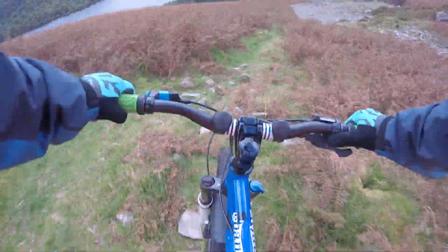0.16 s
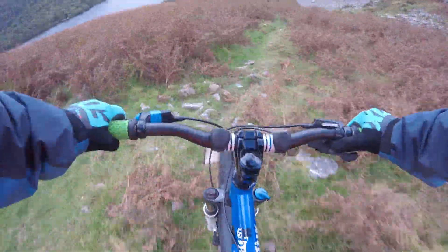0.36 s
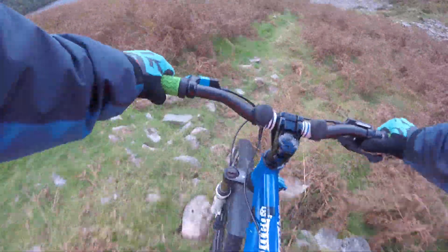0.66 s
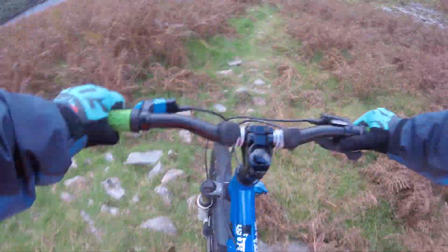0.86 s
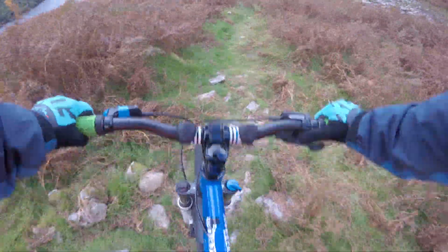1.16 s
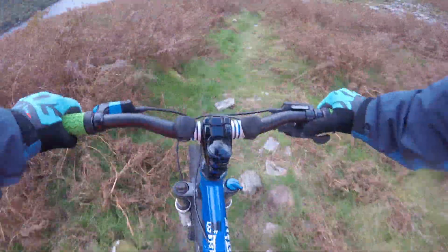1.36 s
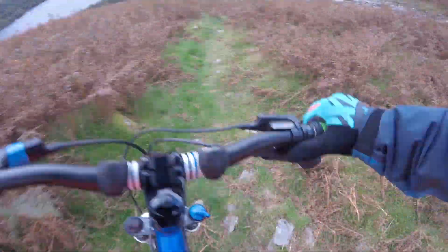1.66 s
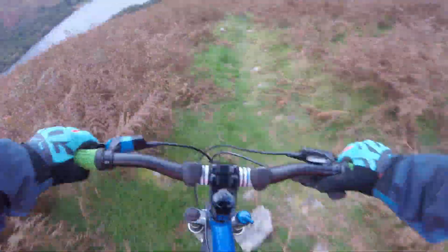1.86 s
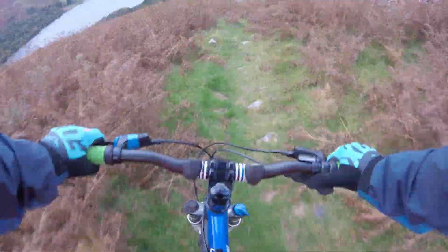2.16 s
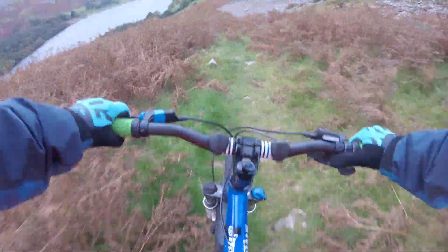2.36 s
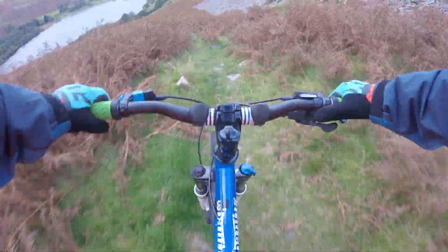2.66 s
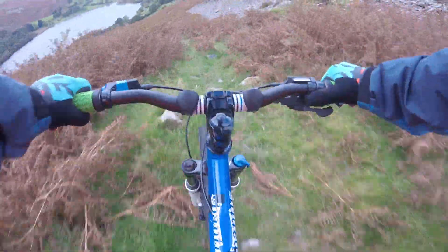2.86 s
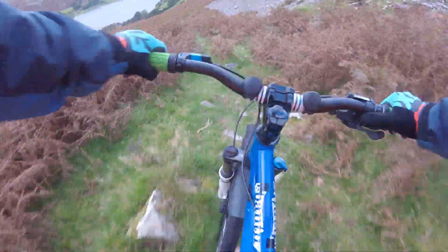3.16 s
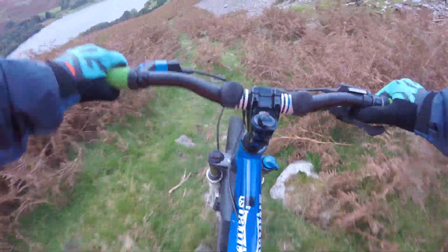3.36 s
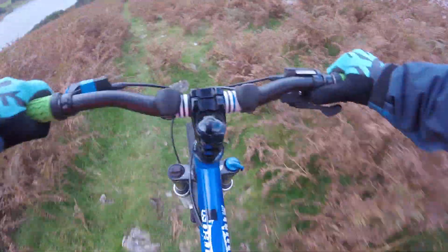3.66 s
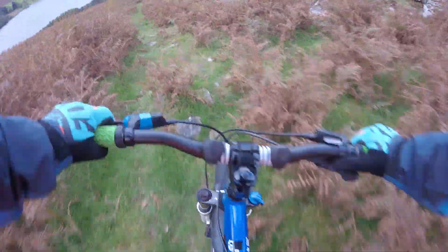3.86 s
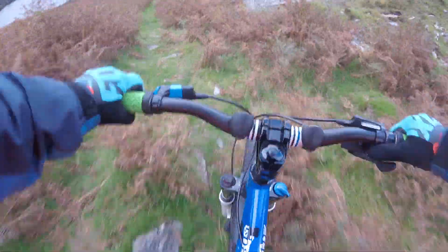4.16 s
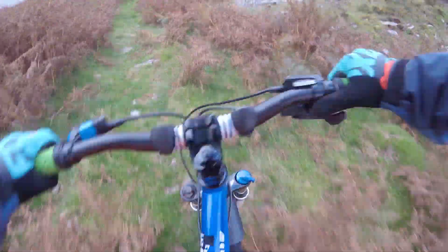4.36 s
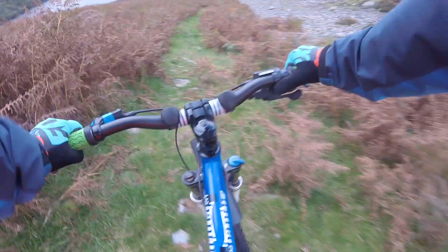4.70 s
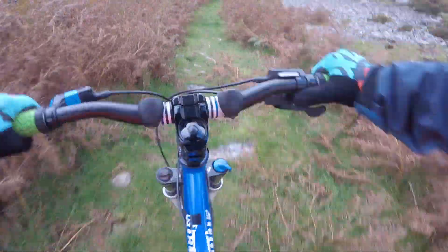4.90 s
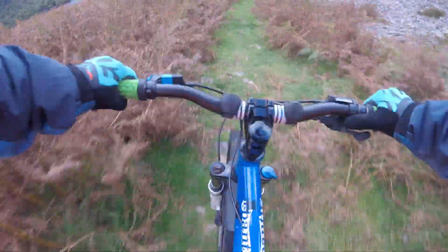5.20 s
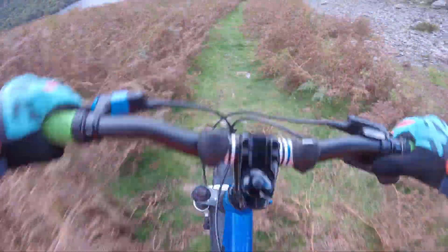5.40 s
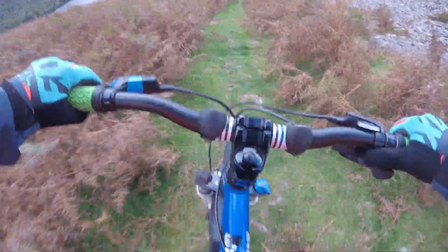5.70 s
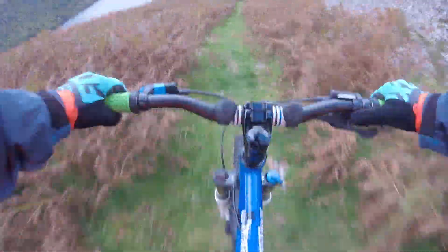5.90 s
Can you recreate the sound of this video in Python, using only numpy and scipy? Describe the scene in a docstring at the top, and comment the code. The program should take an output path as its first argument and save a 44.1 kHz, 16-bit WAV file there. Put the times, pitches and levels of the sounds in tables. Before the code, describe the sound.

Close, dry plastic clacks and padded thumps rattle at uneven intervals as a bike bumps downhill, with short cloth rustles and faint tyres in grass.

```python
"""Clacks, thumps and cloth swishes of a mountain bike jolting down a rocky, grassy trail.
The place is an open hillside; the one microphone sits in a camera strapped to the rider's chest.
Bumps make the loose camera mount clack against its stop, thump on the harness and tick in its joints:
short pushes ring damped modes. The jacket swishing on the straps is coloured noise under stroke envelopes.
Beneath, slow noise makes the low sway of the ride and broad noise the tyres in the grass."""
import sys
import numpy as np
from scipy import signal
from scipy.fft import rfft, irfft, next_fast_len
from scipy.io import wavfile
from scipy.ndimage import uniform_filter1d, map_coordinates

SR = 44100
rng = np.random.default_rng(int(sys.argv[2]) if len(sys.argv) > 2 else 0)


def to_wav(s):
    """Save 16-bit WAV."""
    ch = np.atleast_2d(s).T  # columns
    pcm = np.round(np.clip(ch, -1, 1) * 32767)  # PCM
    wavfile.write(sys.argv[1], SR, pcm.astype(np.int16))


N = 266364  # length [samples]

# low sway of the ride, before its overall gain: (time [s], level [dB])
SWAY_LEVELS = [(0.0, -49), (0.2, -32), (0.54, -46), (0.72, -34), (1.14, -46), (1.21, -36), (1.98, -35.5),
               (2.17, -27), (2.22, -43.5), (4.39, -35), (4.51, -48), (4.84, -29), (5.26, -38.5),
               (5.33, -25.5), (5.42, -38.5), (5.58, -35.5), (6.01, -41.5), (6.04, -52)]
# colour of the sway: (frequency [Hz], relative level per Hz [dB])
SWAY_COLOUR = [(5, -6), (12, -1), (21, 4.5), (30, -14), (45, -9.5), (70, -28), (120, -29), (250, -46),
               (600, -57.5), (2000, -100)]
# colour of tyres in grass: (frequency [Hz], relative level per Hz [dB])
GRASS_COLOUR = [(100, 20.5), (300, 4.5), (500, 2.5), (900, -2.5), (1600, 3), (2250, -1), (3200, -21),
                (4300, -15.5), (6000, -19), (9000, -36), (10500, -48), (15000, -48.5)]
# strokes of jacket cloth: (start [s], length [s], level [dB], extra treble [dB])
CLOTH_STROKES = [(0.062, 0.017, -46.5, 0), (0.16, 0.049, -33.5, 4.5), (0.239, 0.034, -39.5, -0.5),
                 (0.508, 0.021, -38, -2), (0.595, 0.048, -35, 1.5), (0.68, 0.063, -50, -1),
                 (0.759, 0.034, -42.5, 6.5), (0.982, 0.015, -43, 3.5), (1.029, 0.028, -50.5, 1.5),
                 (1.081, 0.022, -54, -2), (1.147, 0.045, -42, 7.5), (1.201, 0.062, -48, 3.5),
                 (1.279, 0.056, -39.5, 0), (1.353, 0.086, -51, -4), (1.413, 0.045, -42, 1.5),
                 (1.474, 0.07, -45.5, 0), (1.571, 0.045, -48, -1.5), (1.633, 0.053, -34.5, 0.5),
                 (1.699, 0.018, -34, 8), (1.877, 0.052, -39, 8), (1.946, 0.039, -47, 5.5),
                 (2.026, 0.021, -36.5, 5.5), (2.068, 0.012, -40, 4), (2.275, 0.029, -47.5, 2.5),
                 (2.331, 0.014, -36, 0), (2.403, 0.036, -40.5, 5), (2.525, 0.017, -49.5, 0),
                 (2.669, 0.032, -53.5, 2), (2.973, 0.032, -52.5, -13), (3.032, 0.024, -37, -1.5),
                 (3.052, 0.035, -38, -9), (3.105, 0.064, -40, 0), (3.294, 0.028, -49, 0),
                 (3.51, 0.02, -47, 2), (3.624, 0.0088, -31, -0.5), (3.66, 0.034, -47, -1.5),
                 (3.909, 0.037, -39, 3), (4.044, 0.024, -41, -3.5), (4.233, 0.041, -44.5, -1),
                 (4.474, 0.039, -58.5, 4), (4.794, 0.027, -26, 3), (4.842, 0.014, -44.5, 3),
                 (4.988, 0.011, -44.5, -2.5), (5.172, 0.011, -35, 4.5), (5.244, 0.022, -49.5, 1.5),
                 (5.459, 0.033, -50, -4), (5.886, 0.0086, -28.5, 3)]
# cloth friction as heard through the case: (frequency [Hz], relative level per Hz [dB])
CLOTH_COLOUR = [(100, 1), (270, -5.5), (550, -21), (1100, -20), (1450, -7.5), (2300, -18.5), (3000, -9),
                (4600, -18), (6500, -23), (9000, -33), (10200, -52), (12000, -35), (14500, -37.5),
                (15800, -76)]
# case resonances and hollows that colour the cloth: (centre [Hz], width [Hz], lift [dB])
CASE_COLOUR = [(1764, 470, 7), (2553, 450, 7.5), (3348, 315, 12), (4330, 160, -1), (5380, 400, -14.5),
               (5650, 610, 11.5), (7500, 48, 11), (8960, 310, 7)]
# colour of the harness as it settles after a jolt: (frequency [Hz], relative level per Hz [dB])
HARNESS_COLOUR = [(20, -14.5), (50, 2.5), (100, 9), (180, -11), (255, 0.5), (320, -23.5), (550, -34),
                  (1000, -34.5), (3000, -76.5)]
# softer bumps, before the gains of thump and tick: (time [s], thump level [dB], tick level [dB])
SOFT_BUMPS = [(0.1535, -15.5, -32.5), (0.2125, -8.5, -38), (0.377, -22, -38.5), (0.3873, -17, -34),
              (0.538, -27, -37.5), (0.573, -43, -51), (0.646, -11.5, -50), (0.6552, -20.5, -27),
              (0.807, -12.5, -28), (0.902, -30, -38.5), (0.9546, -27, -40.5), (0.966, -22.5, -37.5),
              (1.217, -17, -58), (1.5083, -22, -43), (1.69, -21.5, -33), (1.6979, -29, -35),
              (1.8759, -22, -45), (1.9118, -19, -60), (2.093, -11.5, -55), (2.1044, -18, -29),
              (2.2109, -17, -29.5), (2.2216, -17.5, -33), (2.2318, -25.5, -31.5), (2.401, -16, -38),
              (2.479, -34, -60), (2.527, -28.5, -55), (2.708, -24, -52), (2.977, -32.5, -58),
              (3.231, -26, -35.5), (3.47, -24, -43.5), (3.6341, -10, -28), (3.8205, -25, -40.5),
              (3.842, -18.5, -35.5), (3.9738, -22.5, -36.5), (4.167, -17, -40), (4.416, -30, -48),
              (4.624, -23, -41.5), (4.7912, -7.5, -49), (4.7994, -9, -32), (4.866, -17.5, -35),
              (4.8956, -22, -45), (4.9641, -27, -41), (4.9761, -19.5, -44), (5.186, -20.5, -50),
              (5.201, -25, -41), (5.384, -18, -34), (5.455, -27, -43), (5.503, -21.5, -36),
              (5.585, -24, -33.5), (5.6184, -15.5, -30.5), (5.7476, -30.5, -39.5), (5.848, -22.5, -45),
              (5.906, -11, -28)]
# modes of the plastic joints: (mean frequency [Hz], mean level [dB], 60 dB decay time [s])
JOINT_MODES = [(233.5, 5, 0.04), (500, 7, 0.0026), (909, -8.5, 0.041), (1331, 1.5, 0.025),
               (1773, 2.5, 0.016), (2440, -26, 0.18), (2710, -0.5, 0.0078), (3380, -3.5, 0.017),
               (4700, -8, .012)]
# dry taps without a ring, perhaps a zip pull: (time [s], level [dB])
DRY_TAPS = [(1.8709, -38), (2.2047, -38), (2.4248, -35.5), (4.148, -35), (5.1646, -28)]
# modes of a tap: (mean frequency [Hz], mean level [dB], 60 dB decay time [s])
TAP_MODES = [(790, -2, 0.0045), (1465, 5.5, 0.0063), (3000, 4, 0.0042)]
# a hard buckle strikes the case: (time [s], level [dB])
BUCKLE_BLOWS = [(4.1149, -16), (4.117, -28)]
# modes of the buckle: (mean frequency [Hz], mean level [dB], 60 dB decay time [s])
BUCKLE_MODES = [(200, 13, 0.0098), (470, -9, 0.04), (983, -1.5, 0.039), (1330, -9, 0.026),
                (1930, 0, 0.0091), (2600, 8.5, 0.0056), (2950, -5, 0.013), (3870, -9, 0.0094),
                (6400, -20, 0.012)]
# the mount hits its stop: (time [s], strength [dB], corner of the contact's treble [Hz])
STOP_HITS = [(0.0888, -6, 2770), (0.2976, -0.5, 2750), (0.7236, 1.5, 2300), (0.8717, 0.5, 2820),
             (1.3209, -5.5, 2120), (1.7703, 2.5, 2260), (2.0374, -0.4, 2270), (2.142, 4.5, 2500),
             (2.3435, -9, 2260), (2.5811, -0.5, 2600), (3.2036, 0, 2210), (3.3862, -0.8, 2430),
             (3.5574, -5, 2000), (3.7265, 2, 2060), (3.7336, -7, 1650), (4.072, -0.7, 1970),
             (4.3392, -2, 2800), (4.7018, -0.5, 1780), (4.7097, -7.5, 1780), (4.9074, 1.5, 2140),
             (5.0806, -1.1, 1940), (5.3186, 3.5, 1980), (5.5602, 2.5, 2120), (5.6785, 4.5, 2340),
             (5.8357, 0, 2300), (5.9708, -3, 2560)]
# modes of the mount and camera case: (frequency [Hz], width [Hz], gain [dB])
MOUNT_MODES = [(53, 86, 23), (125.4, 75.3, 27.5), (191.6, 33, 12.5), (521, 313, 18.5), (933, 84, 8),
               (1286, 420, 14), (1760, 346, 21), (2030, 85, -7.5), (2540, 136, 17.5), (3126, 350, 14),
               (3845, 165, 16.5), (4796, 310, 20), (5750, 170, 15), (11800, 3700, 14.5)]


def amp(db):
    """Decibels to gain."""
    return 10 ** (np.asarray(db) / 20)


def unit(x):
    """Scale to rms 1."""
    return x / np.sqrt(np.mean(x ** 2) + 1e-20)


def along(points, hz):
    """(Hz, value) points joined by lines on a log frequency axis."""
    f, v = np.transpose(points)
    return np.interp(np.log(hz + 1), np.log(f + 1), v)


def wobble(rate):
    """A smooth random curve with rate knots a second."""
    knots = rng.standard_normal(int(N * rate / SR) + 4)
    return map_coordinates(knots, [np.arange(N) * rate / SR])


def filtered(x, response):
    """Apply a complex response of frequency to x."""
    m = next_fast_len(N + SR // 2)
    hz = np.fft.rfftfreq(m, 1 / SR)
    return irfft(rfft(x, m) * response(hz), m)[:N]


def noise(colour):
    """Noise of rms 1 with the given colour."""
    return unit(filtered(rng.standard_normal(N), lambda hz: amp(along(colour, hz))))


def resonances(modes, hz):
    """Causal response of damped (Hz, width, dB) modes, summed."""
    return sum(amp(db) * 1j * hz * w / (c * c - hz * hz + 1j * hz * w) for c, w, db in modes)


def add(track, s, sound):
    """Mix a sound into the track from time s."""
    part = track[max(round(s * SR), 0):][:len(sound)]
    part += sound[:len(part)]


def strike(modes, scuff_db, scuff_t60, dull_hz):
    """One light blow: modes at new strengths plus a short scuff, rms 1 over its first 4 ms."""
    t = np.arange(SR // 10) / SR
    hz, db, t60 = np.transpose(modes)[:, :, None]
    level, detune = rng.standard_normal((2, len(modes), 1))
    side = rng.choice([-1, 1], (len(modes), 1))
    pitch = hz * (1 + 0.016 * detune)
    decay = amp(db + 2 * level - 60 * t / t60)
    ring = np.sum(side * decay * np.sin(2 * np.pi * pitch * t), axis=0)
    scuff = amp(scuff_db - 60 * t / scuff_t60) * rng.standard_normal(len(t))
    # soft plastic passes little treble
    b, a = signal.butter(3, min(dull_hz, SR / 3), fs=SR)
    sound = signal.lfilter(b, a, ring + scuff)
    return sound / np.sqrt(np.mean(sound[:SR // 250] ** 2))


def shaken(hits, t60):
    """Envelope that every (s, dB, ..) hit lifts within milliseconds and that then dies away."""
    power = np.zeros(N)
    t = np.arange(SR // 2) / SR
    for s, db, *_ in hits:
        envelope = amp(db - 60 * t / t60) * (1 - np.exp(-t / 0.0037))
        add(power, s, envelope ** 2)
    return np.sqrt(power)


def ride(sway_db=2, grass_db=-63, flutter_db=3, tuft_db=2, tuft_rate=160):
    """The camera sways with the rider (slow noise) while the tyres brush through tufts of grass."""
    level_db = np.interp(np.arange(N) / SR, *np.transpose(SWAY_LEVELS))
    # the swing is irregular; evening out its size lets the level table set how far it goes
    swing = noise(SWAY_COLOUR)
    size = np.sqrt(np.abs(uniform_filter1d(swing ** 2, size=SR // 6)))
    sway = amp(level_db + sway_db) * swing / size
    # patches of turf pass slowly, single stalks quickly
    patches = amp(flutter_db * wobble(4.7))
    stalks = unit(amp(tuft_db * wobble(tuft_rate)))
    return sway + amp(grass_db) * patches * stalks * noise(GRASS_COLOUR)


def jacket(grain_db=2.5, grain_rate=450, catch_db=3.36, catch_rate=90, treble_hz=4600,
           rustle_db=-70, fidget_db=4, fidget_rate=22):
    """Cloth breaks loose, slides over the straps and sticks again; its weave catches unevenly on the way."""
    attack_s, release_s = 0.004, 0.0053  # breaking loose, sticking again
    sag_db_per_s = 41  # slowing down
    t = np.arange(-(SR // 20), SR // 5) / SR

    def step(u):
        return (1 + np.tanh(u / 2)) / 2

    def case_lift(hz):
        return amp(sum(db / (1 + (2 * (hz - c) / w) ** 2) for c, w, db in CASE_COLOUR))

    # small shifts of the cloth come and go beneath the strokes
    faint = amp(rustle_db + fidget_db * wobble(fidget_rate))
    body_power, treble_power = faint ** 2, faint ** 2
    for start, length, db, treble_db in CLOTH_STROKES:
        # brighter strokes break loose more abruptly
        loose = step(t * amp(treble_db) / attack_s)
        stick = step((length - t) / release_s)
        power = (amp(db - sag_db_per_s * t) * loose * stick) ** 2
        add(body_power, start + t[0], power)
        add(treble_power, start + t[0], power * amp(treble_db) ** 2)
    weave = unit(amp(grain_db * wobble(grain_rate) + catch_db * wobble(catch_rate)))
    rub = unit(filtered(noise(CLOTH_COLOUR) * weave, case_lift))
    treble = filtered(rub, lambda hz: hz ** 6 / (hz ** 6 + treble_hz ** 6))
    return np.sqrt(body_power) * (rub - treble) + np.sqrt(treble_power) * treble


def settling(after_thump_db=-10, after_clack_db=-30):
    """The harness shudders for a moment after every jolt: dark noise that dies away."""
    after_thumps = amp(after_thump_db) * shaken(SOFT_BUMPS, t60=0.09)
    after_clacks = amp(after_clack_db) * shaken(STOP_HITS, t60=0.11)
    return (after_thumps + after_clacks) * noise(HARNESS_COLOUR)


def thumps(level_db=17, harness_hz=90, pad_s=0.001, pad_spread=0.19):
    """Every bump and clack ends in a slow, padded push that reaches mainly the lowest modes of the mount."""
    thump_lag_s = 0.00263  # the padding gives just after the tick
    follow_s, follow_db = 0.00595, -24.5  # after a clack the camera's weight sinks into the harness
    force = np.zeros(N)
    t = np.arange(-(SR // 100), SR // 100) / SR
    blows = [(s + thump_lag_s, db) for s, db, _ in SOFT_BUMPS]
    blows += [(s + follow_s, db + follow_db) for s, db, _ in STOP_HITS]
    for (s, db), softness in zip(blows, rng.standard_normal(len(blows))):
        # a bell-shaped push; pad_s is its typical standard deviation
        width_s = pad_s * np.exp(pad_spread * softness)
        push = np.exp(-0.5 * (t / width_s) ** 2)
        add(force, s + t[0], -amp(db + level_db) * push / push.sum())
    # the springy harness takes up the slowest part of each push
    return filtered(force, lambda hz: resonances(MOUNT_MODES, hz) * 1j * hz / (harness_hz + 1j * hz))


def rattles(tick_db=-1, stray_db=-60, stray_spread_db=3, stray_count=45):
    """Joints tick and rebound on every bump, with dry taps, stray faint ticks and a buckle's blows."""
    rebound_s, rebound_db = 0.012, -11.5  # a joint falls back and ticks again
    out = np.zeros(N)
    for s, _, db in SOFT_BUMPS:
        for delay, loss_db in [(0, 0), (rebound_s, rebound_db)]:
            tick = strike(JOINT_MODES, scuff_db=-4, scuff_t60=0.037, dull_hz=4000)
            add(out, s + delay, amp(db + tick_db + loss_db) * tick)
    for s, db in DRY_TAPS:
        add(out, s, amp(db) * strike(TAP_MODES, scuff_db=-9, scuff_t60=0.022, dull_hz=4960))
    for s, db in BUCKLE_BLOWS:
        add(out, s, amp(db) * strike(BUCKLE_MODES, scuff_db=-5, scuff_t60=0.026, dull_hz=3840))
    stray_times = rng.uniform(0, N / SR, stray_count)
    for s, size in zip(stray_times, rng.standard_normal(stray_count)):
        tick = strike(JOINT_MODES, scuff_db=4.5, scuff_t60=0.082, dull_hz=4500)
        add(out, s, amp(stray_db + stray_spread_db * size) * tick)
    return out


def clacks(vary_db=0.4, detune=0.051, chatter_db=-36, chatter_t60=0.029, ring_db=-41):
    """Each hard stop is one sharp push on the mount, with faint chatter and the ring of its joints."""
    out = np.zeros(N)
    t = np.arange(SR // 5) / SR
    hz = np.fft.rfftfreq(len(t), 1 / SR)
    for s, db, contact_hz in STOP_HITS:
        push = amp(chatter_db - 60 * t / chatter_t60) * rng.standard_normal(len(t))
        push[0] = 1
        # the mount seats a little differently every time
        chance = rng.standard_normal((len(MOUNT_MODES), 2))
        modes = [(c * (1 + detune * a), w, g + vary_db * b)
                 for (c, w, g), (a, b) in zip(MOUNT_MODES, chance)]
        # the brief plastic contact rounds off the treble
        contact = 1 / (1 + 1j * hz / contact_hz) ** 3
        body = irfft(rfft(push) * resonances(modes, hz) * contact)
        add(out, s, -amp(db) * body)
        ring = strike(JOINT_MODES, scuff_db=2.5, scuff_t60=0.022, dull_hz=5900)
        add(out, s, amp(db + ring_db) * ring)
    return out


def scene():
    """Everything reaches the one microphone from close by, with no echo on the open hillside."""
    return (clacks() + thumps() + settling() + rattles() + jacket() + ride())[None]


def record(dry, ceiling=0.75, fade_hz=12500, top_hz=15757):
    """The highest peaks flatten at the camera's ceiling; the treble fades and stops at its band limit."""
    held = dry[0] / (1 + np.abs(dry[0] / ceiling) ** 10) ** (1 / 10)
    b, a = signal.butter(2, fade_hz, fs=SR)
    soft = signal.lfilter(b, a, held)
    return filtered(soft, lambda hz: 1 / (1 + (hz / top_hz) ** 80))[None]


dry = scene()
out = record(dry)
to_wav(out)
```